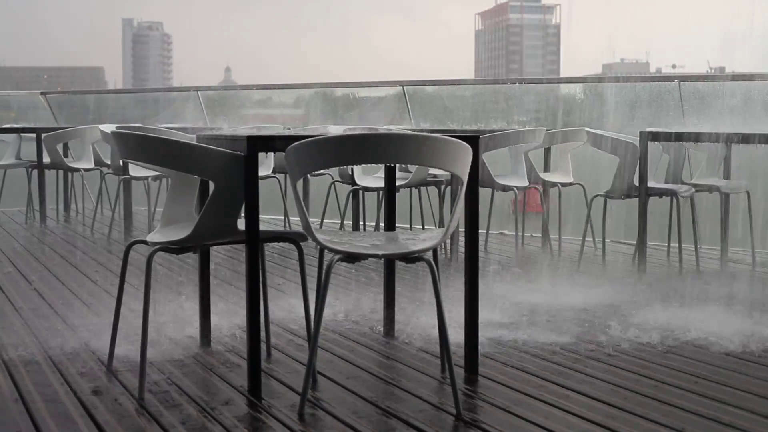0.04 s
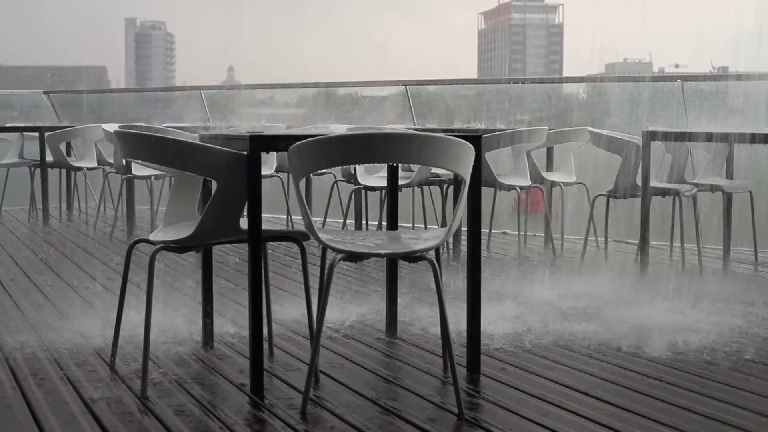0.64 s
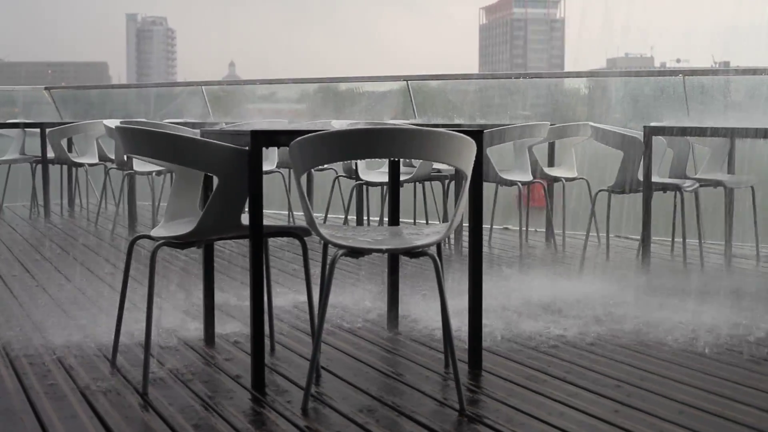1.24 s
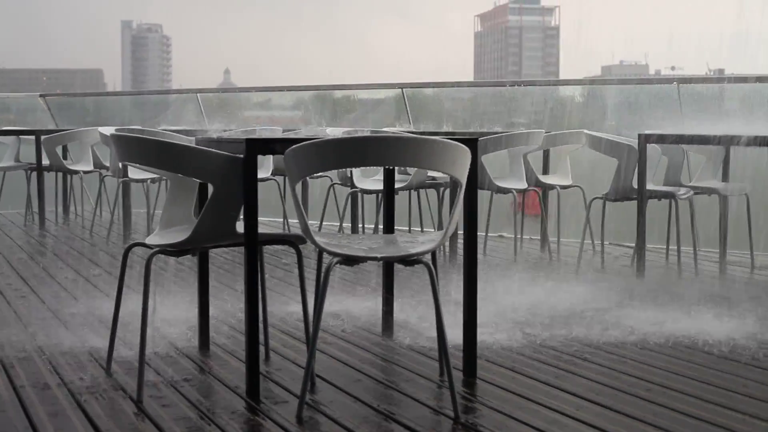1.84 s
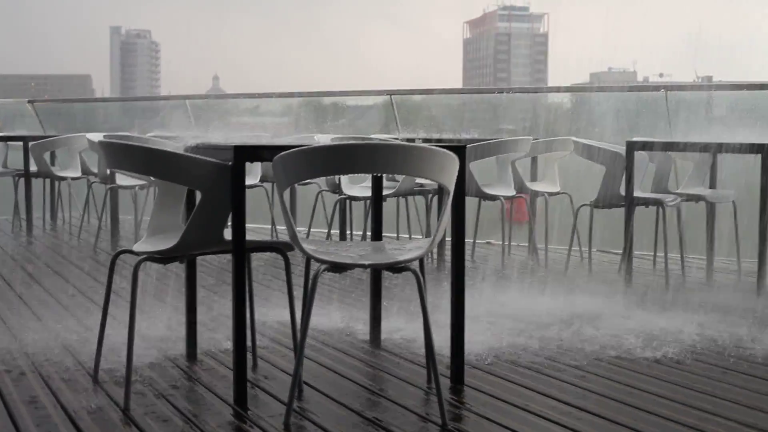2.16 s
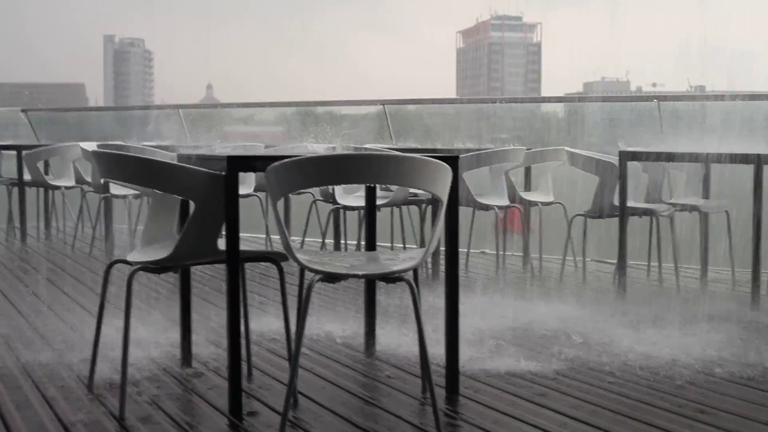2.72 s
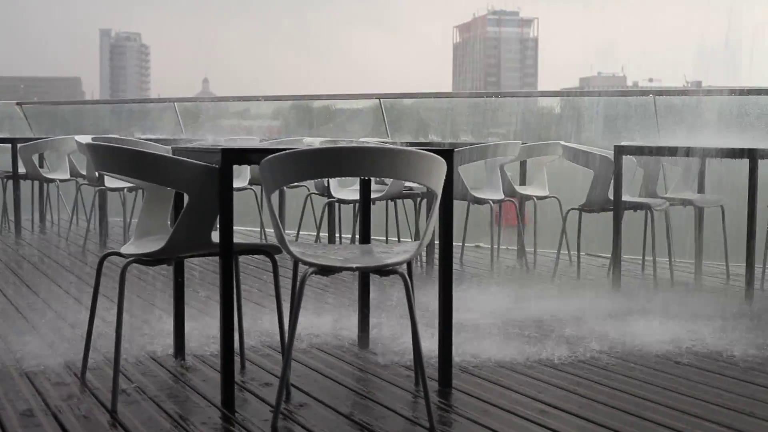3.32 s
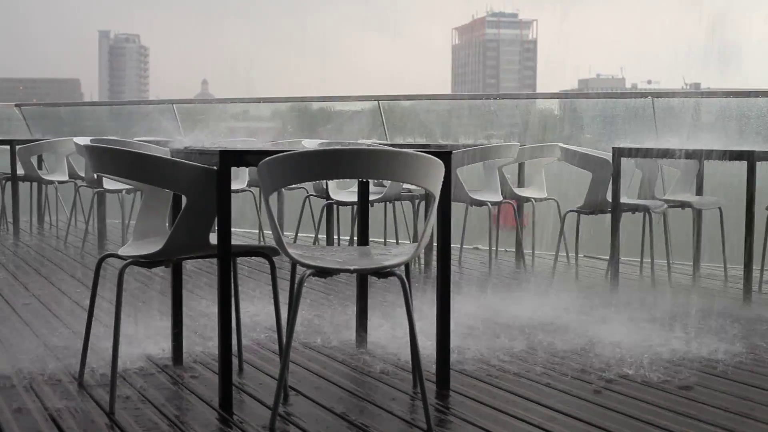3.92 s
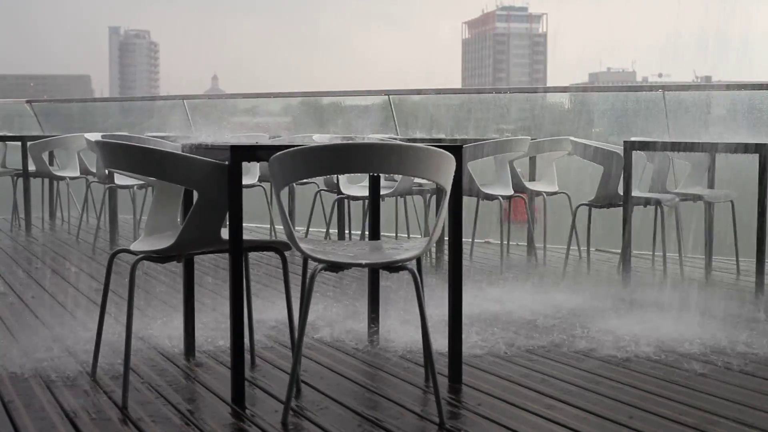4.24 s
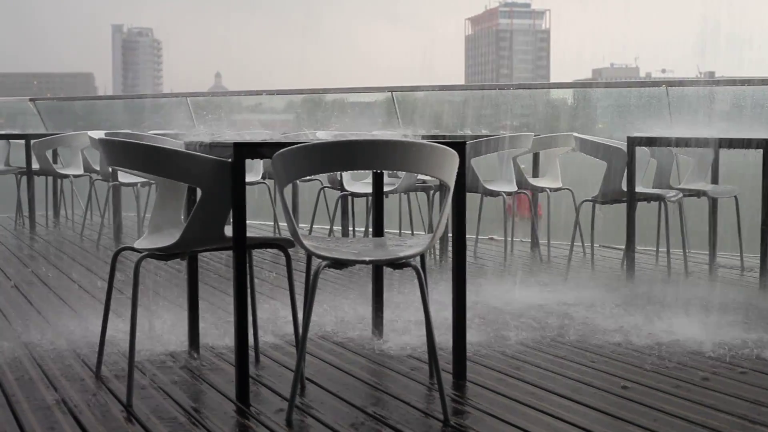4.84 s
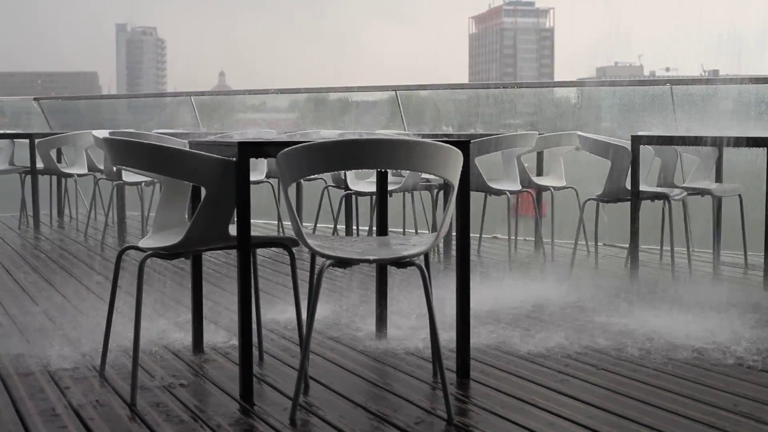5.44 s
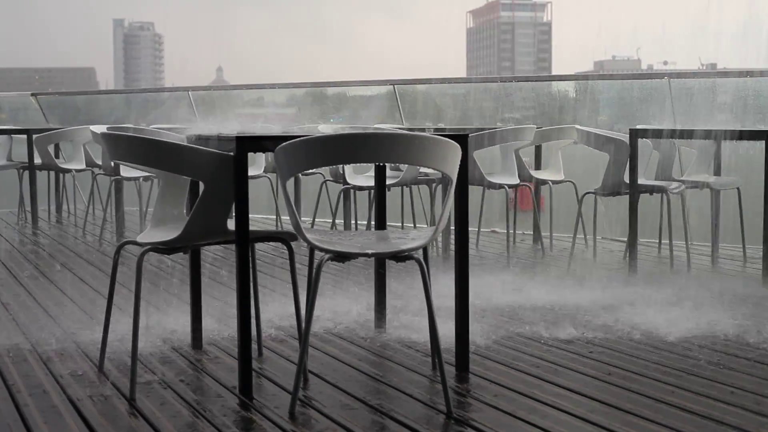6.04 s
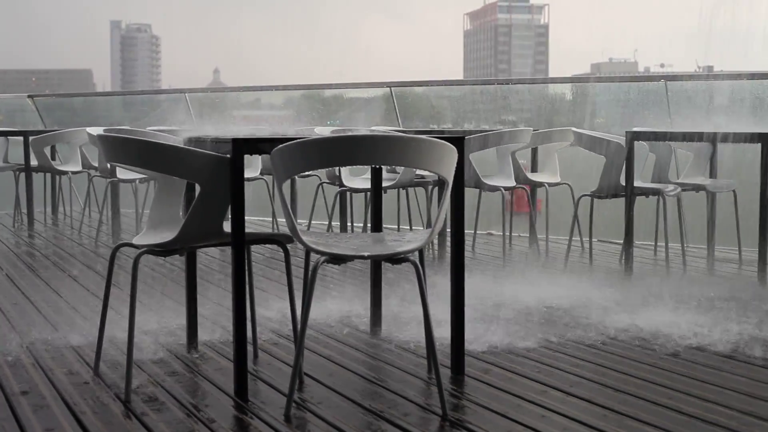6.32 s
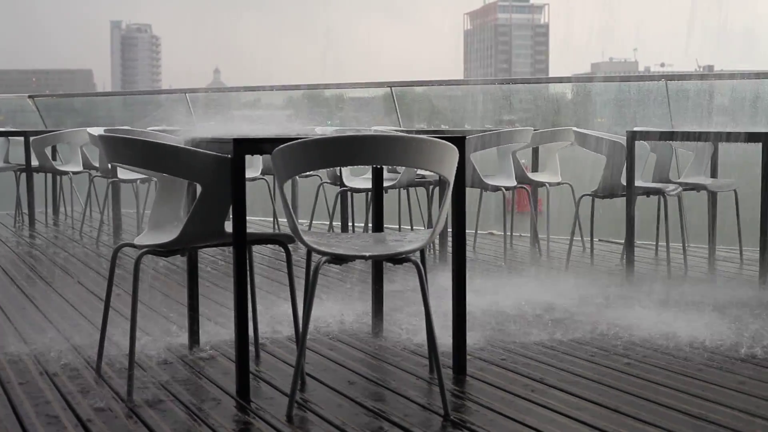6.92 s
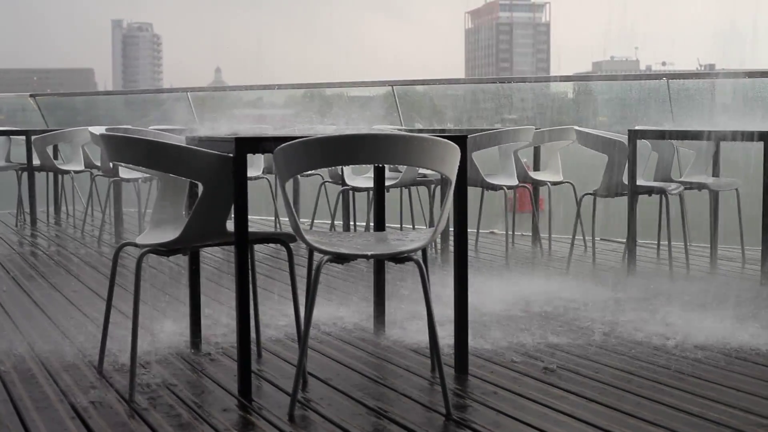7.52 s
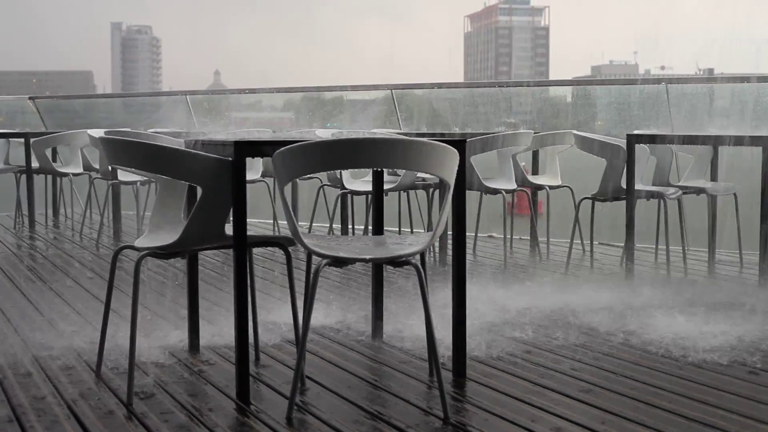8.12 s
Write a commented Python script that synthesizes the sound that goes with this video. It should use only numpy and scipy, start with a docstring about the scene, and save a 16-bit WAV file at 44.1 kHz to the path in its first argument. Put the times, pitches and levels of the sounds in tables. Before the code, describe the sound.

A steady downpour splashes and hisses on wooden boards over a low roar of distant rain, with occasional big drops smacking nearby.

```python
"""A wooden roof deck in a downpour, heard from shelter through one microphone.
Thousands of drop impacts on the wet boards superpose into a patter, over a hiss of spray and the
low roar of rain on the city, coloured by the deck's resonances. A few big drops land close and
make the gain control duck. Far off, an engine speeds up and its firing tone rises."""
import sys
import numpy as np
from scipy import signal
from scipy.fft import rfft, irfft
from scipy.io import wavfile

SR = 44100
rng = np.random.default_rng(int(sys.argv[2]) if len(sys.argv) > 2 else 0)


def unload_wav(signal):
    """Save mono or channel-first audio to the path in sys.argv[1] as 16-bit WAV at rate SR, clipped to [-1, 1]."""
    wavfile.write(
        sys.argv[1],
        SR,
        np.round(np.clip(np.atleast_2d(signal).T, -1, 1) * 32767).astype(np.int16),
    )


N = 360297
TIME = np.arange(N) / SR
BINS = np.fft.rfftfreq(8192, 1 / SR)

# strength of the rain on the near boards: (time [s], relative level [dB])
NEAR_RAIN = [(0.0, -20.5), (0.1, -20), (0.7, -20), (0.9, -21), (1.6, -21.5), (2.3, -20.6), (2.85, -21.5),
             (3.05, -21.7), (3.55, -21.8), (3.75, -21), (4.4, -20.5), (4.7, -21), (5.3, -20.6),
             (5.75, -20.5), (6.1, -22), (6.8, -21), (8.2, -20)]
# spectrum of water striking wet boards: (frequency [Hz], relative spectral density [dB])
SPLASH_SPECTRUM = [(400, -31.5), (1300, -22), (1950, -20), (2200, -12.5), (2700, -9), (3200, -8.5),
                   (4000, -5), (4800, -1), (5700, 0.14), (6500, -2.5), (7500, -8), (9200, -15.5),
                   (11400, -20), (15700, -37)]
# big drops close by: (time [s], relative peak level [dB], pitch [Hz])
CLOSE_DROPS = [(0.7592, -2.1, 5860), (1.1685, -4.5, 6150), (1.36, -5.5, 5540), (2.3121, -1.3, 5990),
               (2.345, -2, 6160), (2.393, -6, 4970), (2.768, -5.5, 6170), (2.8612, -5, 5330),
               (2.953, -4, 5770), (3.8259, -5.5, 6160), (4.4023, -3, 5740), (5.0503, -5, 6350),
               (5.7946, -5.4, 5410), (5.897, -4.5, 4700), (6.8549, -4.5, 4910), (7.2255, -5.0, 5600),
               (7.515, -4.2, 4830), (7.5537, -5.3, 5770), (8.1309, -5, 6420)]
# strength of the downpour further off: (time [s], relative level [dB])
DISTANT_RAIN = [(0.0, -38.2), (0.6, -37.2), (1.5, -39.5), (2.7, -38.5), (3.3, -39.8), (3.8, -38),
                (6.1, -40), (8.2, -38)]
# spectrum of the distant rain: (frequency [Hz], relative spectral density [dB])
ROAR_SPECTRUM = [(23, -34), (34, -15.5), (45, -16), (64, -5.5), (85, -8.5), (138, -7), (160, 0),
                 (240, -1.8), (380, -3.6), (500, -1.35), (900, -1.5), (1250, -4), (1750, -2.5), (2100, -9),
                 (5000, -22)]
# resonance peaks and dips of the drumming deck: (frequency [Hz], bandwidth [Hz], gain [dB])
DECK_RESONANCES = [(193, 25, 2), (284, 26, 6.5), (316, 24, 2.5), (480, 55, 1.5), (600, 36, -2.5),
                   (692, 65, 4), (824, 30, 2), (855, 24, -2.2), (1790, 120, 2), (1950, 130, -3)]
# distant engine: (time [s], firing rate [Hz], level [dB])
ENGINE_RUN = [(1.8, 48, -76), (2.1, 52, -60), (2.5, 57, -58), (2.85, 62, -54), (3.0, 64, -70),
              (3.4, 69, -59.5), (3.7, 68, -76)]


def smack(hz, cycles, spatter, spatter_s):
    """A drop's impact is a transient: a heavily damped oscillation, then a decaying spatter of droplets."""
    t = np.arange(SR // 100) / SR
    age = t * hz / cycles  # 1 at the envelope's peak
    snap = age * np.exp(1 - age) * np.sin(2 * np.pi * (hz * t + rng.random()))
    droplets = spatter * rng.standard_normal(len(t)) * np.exp(-t / spatter_s) * (1 - np.exp(-age))
    return snap + droplets


def patter(per_s, spread_db, clump_db, cycles, pitches):
    """Impacts on the boards form a Poisson process whose drifting rate gathers them into clumps."""
    density = amp(clump_db * wander(5, 45))
    arrivals = np.flatnonzero(rng.random(N) < per_s / SR * density / density.mean())
    kind = rng.integers(0, pitches, N)[arrivals]
    size = amp(spread_db * np.minimum(rng.exponential(1, N), 3.3))[arrivals]
    out = np.zeros(N)
    for k, hz in enumerate(np.geomspace(1500, 14000, pitches)):
        hits = np.zeros(N)
        hits[arrivals[kind == k]] = size[kind == k]
        drop = unit_rms(smack(hz, cycles * rng.uniform(.5, 2), spatter=.06, spatter_s=.002))
        out += signal.oaconvolve(hits, drop * np.sqrt(hz))[:N]
    return coloured(out, spectrum(SPLASH_SPECTRUM))


def spray(flutter_db):
    """Countless small drops sum incoherently to a hiss, amplitude-modulated by passing sheets of rain."""
    hiss = rng.standard_normal(N) * amp(flutter_db * wander(4.4, 40))
    return coloured(hiss, spectrum(SPLASH_SPECTRUM))


def big_drops(cycles, lead_s):
    """A brief impact has a broad spectrum: single drops near the microphone make sharp smacks."""
    out = np.zeros(N)
    wet_wood = signal.butter(2, [2500, 9000], "band", fs=SR, output="sos")
    for s, db, hz in CLOSE_DROPS:
        drop = signal.sosfilt(wet_wood, smack(hz, cycles, spatter=0.26, spatter_s=.0015))
        add(out, s - lead_s, amp(db) * drop / abs(drop).max())
    return out


def roar(swell_db):
    """Distant rain merges into low noise; resonance of the deck adds narrow peaks and dips."""
    deck_db = sum(db / (1 + (2 * (BINS - hz) / width) ** 2) for hz, width, db in DECK_RESONANCES)
    wash = coloured(rng.standard_normal(N), spectrum(ROAR_SPECTRUM) + deck_db)
    return wash * amp(swell_db * wander(0.91, 8.8))


def engine(waver_db):
    """Periodic firing makes a tone, of which only the fundamental carries through the rain."""
    hz, db = curves(ENGINE_RUN)
    tone = unit_rms(np.sin(2 * np.pi * np.cumsum(hz) / SR))
    return amp(db + waver_db * wander(2, 10)) * tone


def amp(db):
    """Amplitude ratio: a factor of ten for every 20 dB."""
    return 10 ** (np.asarray(db) / 20)


def unit_rms(x):
    """Normalisation to a mean power of 1."""
    return x / np.sqrt(np.mean(x ** 2) + 1e-20)


def curves(rows):
    """Linear interpolation of each column of a time table, at every sample."""
    s, *columns = np.transpose(rows)
    return [np.interp(TIME, s, column) for column in columns]


def spectrum(points):
    """Interpolation of levels in dB on a log-frequency axis."""
    hz, db = np.transpose(points)
    return np.interp(np.log(BINS + 1), np.log(hz), db)


def coloured(x, db):
    """Minimum-phase filtering is causal, so clicks keep their sharp onset; the result has rms 1."""
    log_gain = np.log(amp(np.concatenate([db, db[-2:0:-1]])))
    response = np.exp(np.conj(signal.hilbert(log_gain)))
    taps = irfft(response[:len(db)])
    return unit_rms(signal.oaconvolve(x, taps[:len(db)])[:N])


def wander(slow_hz, fast_hz):
    """A 1/f fluctuation of rms 1: about equal power per octave between two rates."""
    hz = np.fft.rfftfreq(N, 1 / SR)
    shape = hz / (hz ** 2 + slow_hz ** 2) ** (3 / 4) / (1 + (hz / fast_hz) ** 4)
    return unit_rms(irfft(rfft(rng.standard_normal(N)) * shape, N))


def add(mix, s, sound):
    """Superposition of a sound on the mix, starting at time s."""
    part = mix[max(round(s * SR), 0):][:len(sound)]
    part += sound[:len(part)]


def scene():
    """All sources superpose at one microphone, which feeds both channels."""
    (near_db,), (far_db,) = curves(NEAR_RAIN), curves(DISTANT_RAIN)
    drops = amp(-3.3) * patter(per_s=9000, spread_db=3.0, clump_db=1.0, cycles=1.28, pitches=32)
    sheets = amp(.32 * wander(slow_hz=4, fast_hz=12))  # sheets of rain sweep the boards at random
    near = amp(near_db) * sheets * (drops + amp(-2.2) * spray(flutter_db=.22))
    far = amp(far_db + 1.55) * roar(swell_db=0.23)
    smacks = amp(-0.12) * big_drops(cycles=0.67, lead_s=.0002)
    mono = near + smacks + far + engine(waver_db=1.2)
    return np.array([mono, mono])


def record(dry):
    """Automatic gain control ducks after peaks above a threshold and creeps back; a low-pass follows."""
    threshold_db, slope, recovery_db_per_s, attack_s = -5.9, .58, 4.0, 0.05
    cutoff_hz = 15720
    level_db = 20 * np.log10(abs(dry).max(0) + 1e-9)
    demand_db = slope * (level_db - threshold_db)
    recovery_db = recovery_db_per_s * TIME
    duck_db = np.maximum(np.maximum.accumulate(demand_db + recovery_db) - recovery_db, 0)
    pole = np.exp(-1 / (attack_s * SR))
    ducked = dry * amp(-signal.lfilter([1 - pole], [1, -pole], duck_db))
    low_pass = signal.firwin(1023, cutoff_hz, window=("kaiser", 9), fs=SR)
    return signal.oaconvolve(ducked, low_pass[None], "same")


dry = scene()
out = record(dry)
unload_wav(out)
```